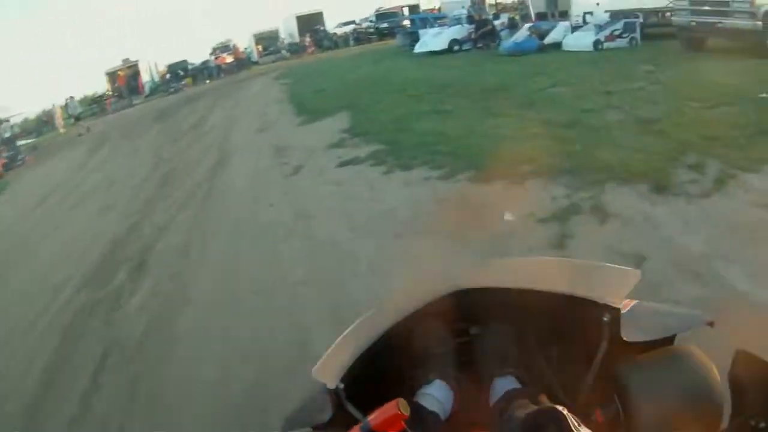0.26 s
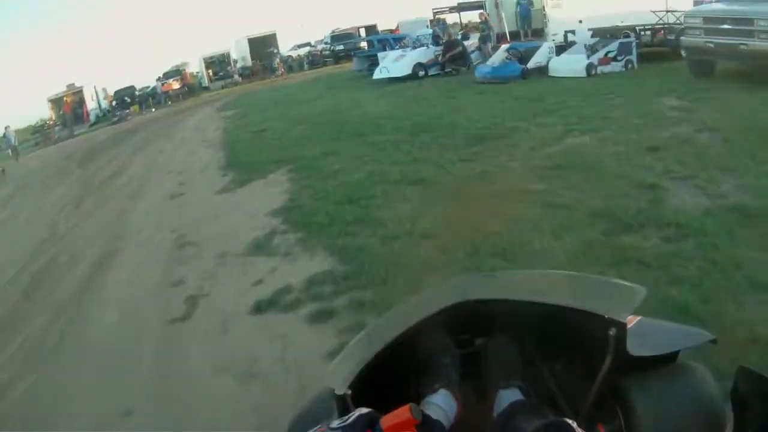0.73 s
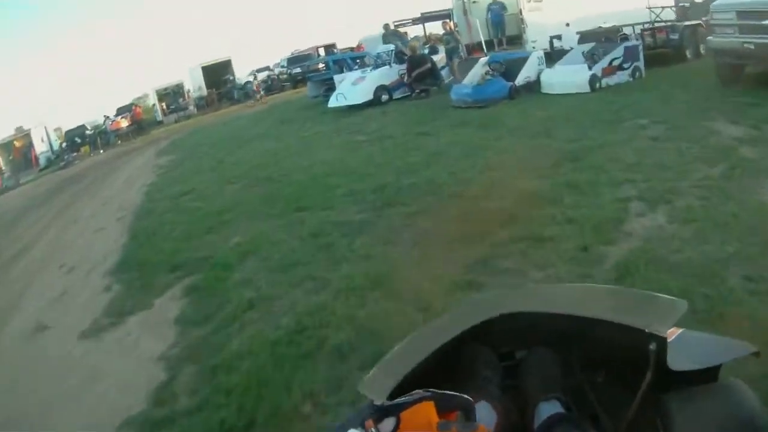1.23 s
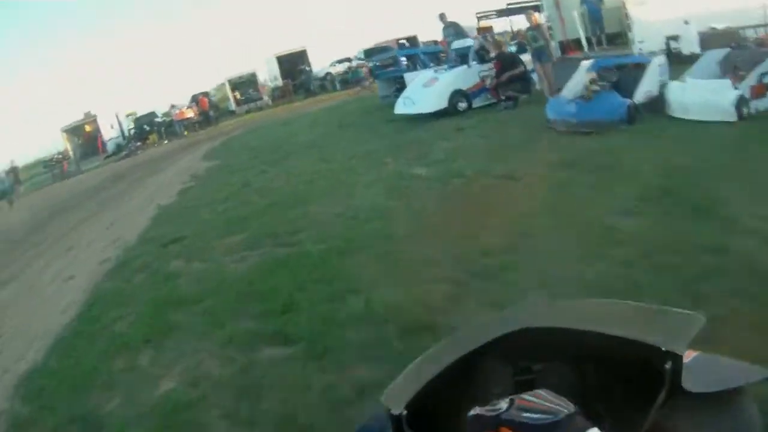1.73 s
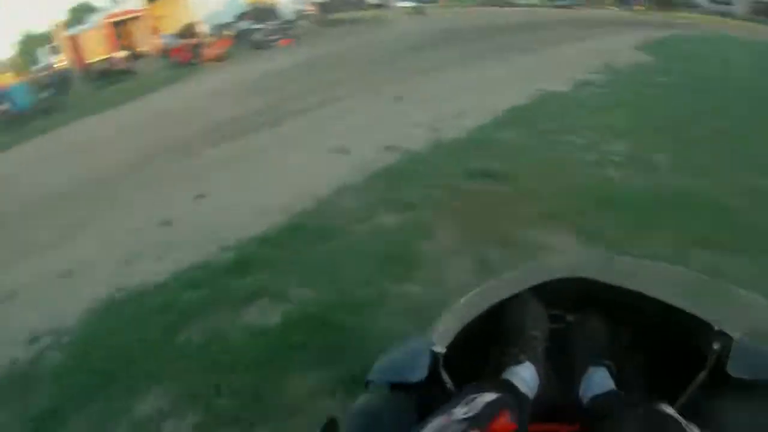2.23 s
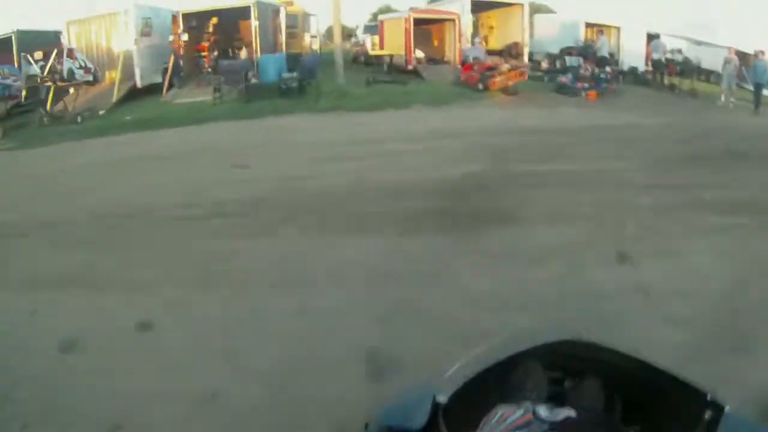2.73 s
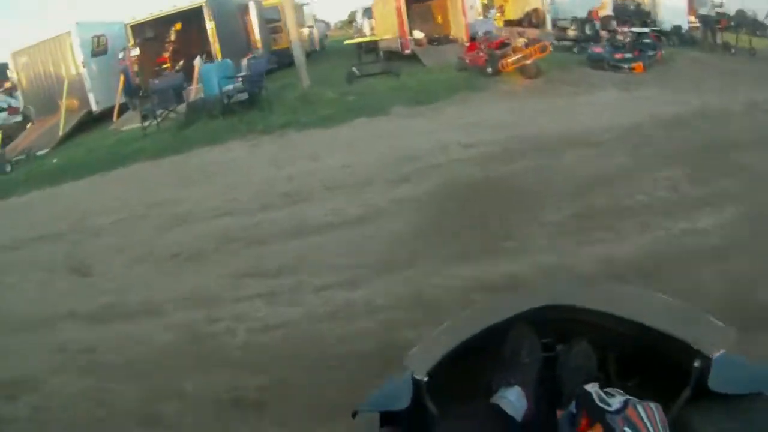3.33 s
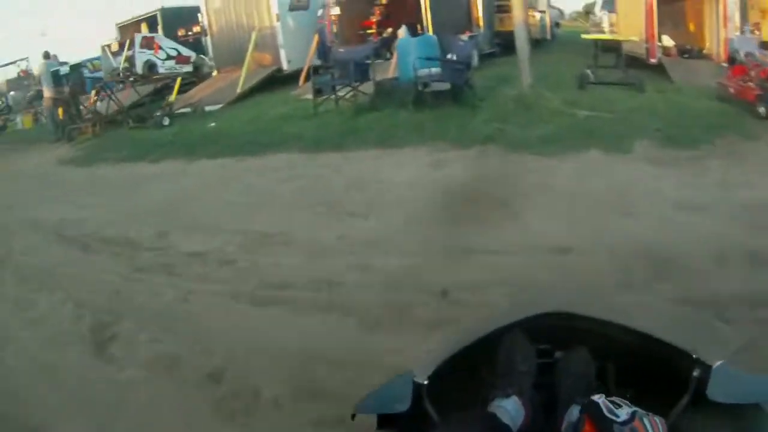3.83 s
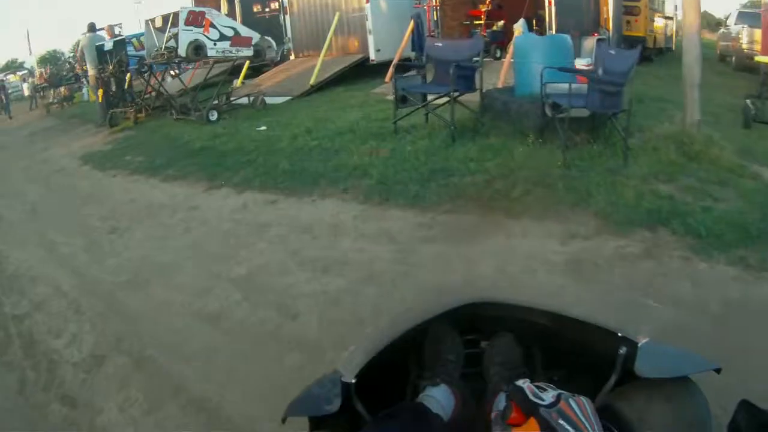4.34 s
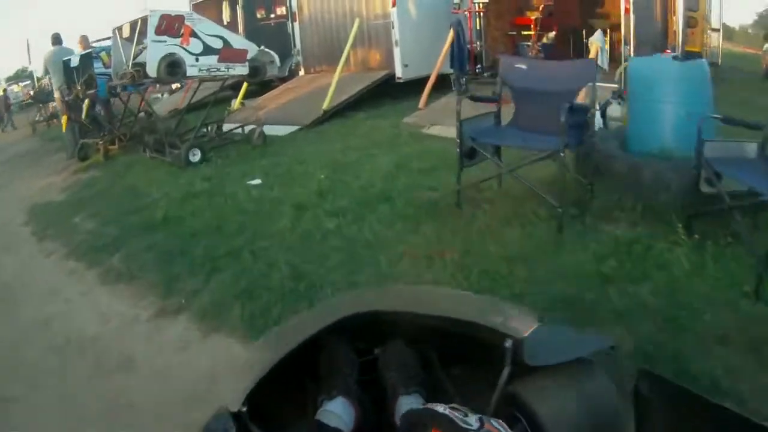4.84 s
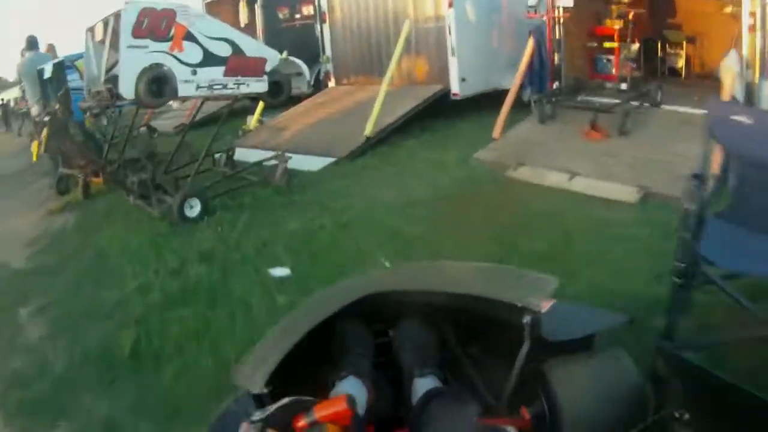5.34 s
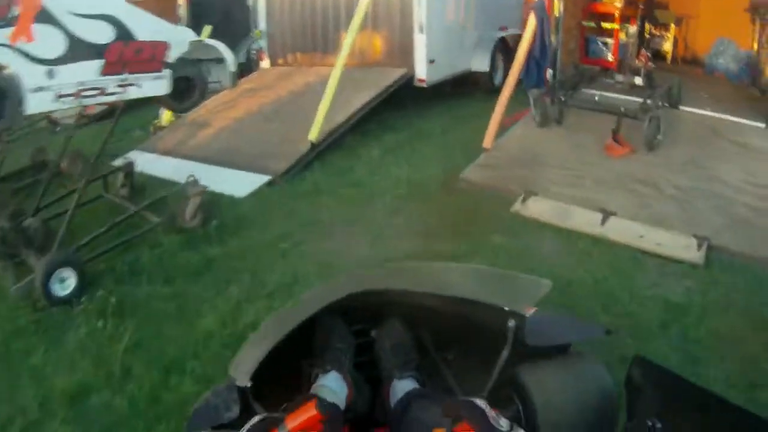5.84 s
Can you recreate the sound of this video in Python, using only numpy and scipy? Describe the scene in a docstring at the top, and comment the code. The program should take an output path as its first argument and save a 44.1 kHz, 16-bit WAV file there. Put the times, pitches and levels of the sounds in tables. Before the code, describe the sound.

Heard from on board, a single-cylinder kart engine sputters along, revs harder, then falls to an uneven, popping tick-over with two short blips.

```python
"""The lumpy, misfiring idle of a single-cylinder four-stroke racing kart, close on a microphone riding on it.
Rolling through the pits, it barks under throttle, is blipped twice and drops to a slow, coughing tick-over.
The pedal sets speed and charge. Each firing is a silencer boom, a bark and a gush of gas, with the intake
gulping between. Behind the exhaust the valve gear clatters, the chain rattles, the ride rumbles,
loose metal chinks, and the chassis knocks and squeaks once."""
import sys
import numpy as np
from scipy import signal
from scipy.fft import rfft, irfft, next_fast_len
from scipy.io import wavfile
from scipy.ndimage import map_coordinates

SR = 44100
rng = np.random.default_rng(int(sys.argv[2]) if len(sys.argv) > 2 else 0)


def waveform_to_disk(signal):
    """Save audio, clipped to [-1, 1], as 16-bit WAV at the path in sys.argv[1]."""
    frames = np.transpose(np.atleast_2d(signal))
    scaled = np.clip(frames, -1, 1) * 32767
    samples = np.round(scaled).astype(np.int16)
    wavfile.write(sys.argv[1], SR, samples)


N = 268128
TIME = np.arange(N) / SR
SIZE = 2 * next_fast_len(N // 2 + SR // 4)
HZ = np.fft.rfftfreq(SIZE, 1 / SR)

# pedal moves: start_s, opening (0-1), goal_firings_per_s, lag_s
PEDAL_MOVES = [(0, .38, 25.77, .2), (.588, .37, 23.65, .316), (1.134, .3, 27.55, .186),
               (1.433, 1, 32.86, .156), (2.815, 0, 17.94, .155), (3.643, .85, 33.2, .186),
               (3.923, 0, 14.8, .273), (4.96, .59, 30.62, .133), (5.114, 0, 12.9, .496)]
# top speed that the engine holds against the clutch: time_s, firings_per_s
SPEED_CEILING = [(1.58, 30.02), (1.72, 30.35), (1.8, 30.03), (2.12, 30.03), (2.2, 29.85), (2.48, 30.15),
                 (2.6, 29.88), (2.8, 29.85), (3.8, 30.02)]
# misfires (weaker) and coughs (stronger): time_s, change_db, snap (0-1)
ODD_FIRINGS = [(0.024, -8.5, 0), (.064, 1.5, 0), (0.105, 0.5, 0), (.181, -5, 0.1), (.22, 1.5, 0),
               (0.452, -12, 0), (0.49, 3, 0), (0.569, -8, 0), (0.608, 2, 0), (.687, 1.5, 0),
               (0.767, -10, 0), (.849, -6, 0), (.969, -18, 0), (1.009, 1, 0), (1.052, -12, 0),
               (1.097, -12, 0), (1.137, 0, 0), (1.334, -7, 0.1), (1.445, -2, 0), (1.481, -3, 0.4),
               (2.929, -2.5, 0), (3.062, 1.5, 0), (3.164, 6.5, 0), (3.445, -16, 0), (3.5, -12, 0),
               (3.545, 10.5, 0.9), (3.605, 12, 0.8), (3.658, 4, 0.53), (3.708, -12, 0), (3.75, -3, 0.5),
               (3.964, 1.5, 0), (3.999, 2, 0), (4.128, 2, 0.3), (4.173, 1.5, 0.1), (4.225, 3, 0.1),
               (4.386, 5.5, 0), (4.445, 4.5, 0), (4.499, 11.5, 0.6), (4.684, 8.5, 0.9), (4.819, 17, 0.83),
               (4.889, 10, 0.1), (4.98, -12, 0), (5.007, 4.5, .9), (5.054, 0.5, 1), (5.096, 1.5, 0.7),
               (5.138, 1, 0.7), (5.174, -0.5, 0.4), (5.22, -1.5, 0), (5.262, -1, 0), (5.356, 2.5, 0),
               (5.569, -1, 0), (5.611, 9.5, 0.65), (5.794, 11, 0.85), (5.92, -15, 0), (6.052, 14, 0.6)]
# loose metal on the shuddering frame: start_s, level_db, pitch_hz
LOOSE_METAL = [(3.02, -55, 14300), (3.112, -62, 9300), (3.275, -58, 7150), (3.337, -52, 8800),
               (3.395, -55.5, 6650), (3.465, -57, 6650), (3.55, -55, 6700), (3.818, -51, 13900),
               (3.845, -51, 13300), (4.5, -55, 6700), (4.579, -60, 8000), (4.69, -50, 6650),
               (4.825, -53, 6600), (5.172, -52, 10500), (5.925, -58, 6500), (5.983, -54, 6650),
               (6.058, -52, 6650)]
# rise and fall of the chain's rattle: time_s, relative_db
CHAIN_LEVELS = [(0.0, -49.5), (0.51, -48), (1.18, -50), (1.49, -45), (1.73, -43), (2.1, -42), (2.59, -43),
                (2.71, -42.5), (2.88, -48.5), (3.35, -55), (3.62, -54.5), (3.77, -46.5), (3.93, -44.5),
                (4.21, -53.5), (4.77, -54), (5.23, -48), (5.54, -53), (6.08, -54.5)]
# share of each colour through the turn: time_s, before (0-1), after (0-1)
TURN_BLEND = [(0, 0.44, 0.2), (1.2, .4, 0.5), (1.55, 1, 0), (1.85, 0.9, 0.3), (2.3, 0.25, 0.96),
              (2.55, 0.1, 1), (2.9, 0, 0.86), (3.3, 0, 0.4), (6.08, 0.47, 0)]

# broad spectrum of each source: frequency_hz, relative_db
RIDE_SPECTRUM = [(15, -28), (33, -5), (55, -24), (85, -22), (130, -18.5), (195, -16), (250, -27.5),
                 (600, -62)]
KNOCK_SPECTRUM = [(300, -18), (1500, -1), (3600, 4), (4800, 9), (6500, -31), (15000, -30)]
CHAIN_SPECTRUM = [(300, -51), (1500, -10), (3000, -7), (4900, 0.5), (6000, -6.5), (9000, -6),
                  (12000, -11.5), (15000, -11)]
VALVE_SPECTRUM = [(100, -46), (300, -16), (700, -8.5), (1050, -2), (1400, -1.5), (2000, -7), (3000, -8.5),
                  (4900, -11.5), (9000, -12), (15000, -31)]
SUCTION_SPECTRUM = [(30, -35), (120, -19), (190, -2.5), (260, -19), (400, -25), (550, -14), (800, -18),
                    (1500, -54)]
GULP_SPECTRUM = [(100, -53), (250, -0.5), (400, 3), (480, 7), (550, 6.5), (650, -1.5), (750, -25.5),
                 (900, 8.5), (1200, -26), (3000, -32)]
THUMP_SPECTRUM = [(30, -21), (60, -13), (85, -6), (125, 1.5), (170, 2), (230, -25), (400, -30), (1000, -68)]
RASP_SPECTRUM = [(1000, -21), (3000, 7), (6000, -13), (10000, -4.5), (15000, -2)]
CHUFF_SPECTRUM = [(400, -21.5), (800, -9.5), (1080, -1.5), (1400, -8), (1800, 3.5), (2200, -10),
                  (3000, -10), (6000, -21.5)]
SNAP_SPECTRUM = [(300, -33), (900, 8), (2000, -20.5), (4000, 6), (7000, 8.5), (10000, 0), (15000, 1)]
SPIT_SPECTRUM = [(200, -51), (700, -37.5), (1100, -9), (1400, -4), (2100, -3.5), (3000, -1), (4500, -1),
                 (6000, -7.5), (9000, -9.5), (12500, -11.5), (15000, -16)]
PUFF_SPECTRUM = [(200, -45), (700, -3.5), (1100, -4), (1400, -2.5), (2100, -0.5), (3000, -2.5),
                 (4500, -6.5), (6000, -10), (9000, -7.5), (12000, -16), (15000, -9)]
PUTT_SPECTRUM = [(100, -24), (290, -9), (450, -12), (680, -4), (800, -1), (980, -1.5), (1400, -3),
                 (1950, -3.5), (3000, -12.5), (4500, -12.5), (7000, -13.5), (15000, -47)]
BARK_SPECTRUM = [(100, -58.5), (280, -25.5), (400, -6), (700, -11), (900, 1), (1300, -12.5), (1850, 4.5),
                 (3000, -20), (4400, -5), (7000, -62), (15000, -74)]
BOOM_SPECTRUM = [(20, 6.5), (60, 1.5), (90, -30), (130, 3.5), (205, -7), (255, -12.5), (320, -6.5),
                 (400, -3), (600, -8.5), (900, -16), (1500, -56)]

# resonances and dips: centre_hz, width_hz, gain_db
BODY_MODES = [(511, 120, 7), (636, 112, 6.5), (821.4, 62, 8), (898.4, 66.5, 10), (958, 104, 8.5),
              (1047, 182, 11.5), (1192, 134, 10.5), (1529, 163, 14.5), (1741, 118, 9.5), (1832, 180, 9.5),
              (2008, 79, 8.5), (2196, 216, 11.5), (2558, 286, 14.5), (2927, 62, 10.5), (3340, 323, 14.5),
              (3826, 260, 11), (4367, 210, 8.5), (4790, 150, 9), (5092, 440, 9), (7055, 900, 10.5),
              (8660, 120, 7.5), (9810, 850, 5), (11420, 500, 6)]  # silencer and bodywork
BODY_DIPS = [(1270, 160, 1), (1690, 58, -9), (3020, 220, 0), (6200, 440, -1.5), (10360, 600, 0)]  # between those modes
CHAMBER_MODES = [(175.8, 38, 10), (193, 32.4, 19.5), (456, 290, -1.5)]  # air in the silencer
PIPE_MODES = [(824, 39, 2), (877.5, 22.5, -15), (902, 49, 8.5), (914, 23, -3), (995, 78, 3.5),
              (1800, 100, 3.5), (2814, 98, 6.5), (3120, 75, -12.5), (3850, 115, -8), (4330, 79, 0.5)]  # exhaust pipe under load
DRIVE_MODES = [(3630, 97, 2.5), (5050, 87, 3), (5740, 190, 9.5), (5930, 200, -9), (6990, 130, 2.5),
               (7930, 140, 4), (9960, 140, 7)]  # chain, sprocket and clutch drum
COLOUR_BEFORE = [(420, 430, 3.5), (662, 80, 3.5), (935, 114, -4), (1030, 70, 2), (1345, 68, 7),
                 (1705, 74, 2), (2870, 730, 4.5), (4410, 150, 8), (6280, 200, 7), (9000, 150, 10.5)]  # going into the turn
COLOUR_AFTER = [(740, 100, 2), (1620, 200, 3), (2140, 270, 4), (2470, 87, -2.5), (3330, 250, -4),
                (3880, 300, -3), (4180, 130, 8.5)]  # coming out of it


def amp(db):
    """Decibels to gain."""
    return 10 ** (np.asarray(db) / 20)


def wobble(rate, at=TIME):
    """A smooth random curve with rate knots per unit."""
    return map_coordinates(rng.standard_normal(int(at[-1] * rate) + 4), [at * rate], mode="nearest")


def lagged(x, lag_s):
    """x followed sluggishly."""
    step = 1 / (lag_s * SR)
    return signal.lfilter([step], [1, step - 1], x - x[0]) + x[0]


def colour(spectrum, resonances=()):
    """Causal response of unit power gain: a broad spectrum with ringing peaks."""
    points_hz, points_db = np.transpose(spectrum)
    db = np.interp(np.log(HZ + 1), np.log(points_hz), points_db)
    db += sum(gain / (1 + (2 * (HZ - hz) / width) ** 2) for hz, width, gain in resonances)
    cepstrum = irfft(np.log(amp(db)))
    cepstrum[1:SIZE // 2] *= 2  # fold to minimum phase
    cepstrum[SIZE // 2 + 1:] = 0
    return np.exp(rfft(cepstrum)) / np.sqrt(np.mean(amp(db) ** 2))


def filtered(x, response):
    """x through a frequency response."""
    return irfft(rfft(x, SIZE) * response, SIZE)[..., :N]


def noise(envelope, spectrum, resonances):
    """Noise shaped by an envelope, then coloured."""
    return filtered(envelope * rng.standard_normal(N), colour(spectrum, resonances))


def pulses(times, sizes):
    """One impulse at each time."""
    return np.bincount(np.clip(np.round(times * SR).astype(int), 0, N), sizes, N + 1)[:N]


def gush(rise_s, decay_s):
    """Envelope of peak 1 that swells and dies away."""
    t = TIME[:SR // 8]
    shape = (1 - np.exp(-(t / rise_s) ** 2)) * np.exp(-t / decay_s)
    return shape / shape.max()


def gushes(times, sizes, rise_s, decay_s):
    """One gush envelope at each time."""
    return signal.fftconvolve(pulses(times, sizes), gush(rise_s, decay_s))[:N]


def throttle(run_on_s=0.0776, run_on_share=0.78, fill_s=0.021):
    """Speed (firings per second) and charge (0-1): each pedal move starts a glide, up to a ceiling."""
    speed, opening = np.full(N, float(PEDAL_MOVES[0][2])), np.zeros(N)
    ceiling = np.interp(TIME, *np.transpose(SPEED_CEILING))
    for start_s, opened, goal, lag_s in PEDAL_MOVES:
        start = round(start_s * SR)
        glide = goal + (speed[start] - goal) * np.exp(-TIME[:N - start] / lag_s)
        speed[start:] = np.minimum(glide, ceiling[start:])
        opening[start:] = opened
    run_on = run_on_share * np.interp(TIME - run_on_s, TIME, opening)  # the intake feeds on after a lift
    return speed, lagged(np.maximum(opening, run_on), fill_s)


def firings(speed, charge, shut_db=-39, full_db=-26.5, starve_speed=21.65, jitter_s=0.00009):
    """Phase in cycles and each firing's time, strength and snap: more charge hits harder."""
    cycle = 1 / 3 + np.cumsum(speed) / SR
    times = np.interp(np.arange(1, int(cycle[-1]) + 1), cycle, TIME)
    starved_db = 1.83 * (1 - charge) * np.maximum(starve_speed - speed, 0)  # a slow, shut engine fades
    effort_db = shut_db + (full_db - shut_db) * charge - starved_db
    unsteady_db = 0.5 + 0.37 * (1 - charge)
    level_chance, time_chance = rng.standard_normal((len(times), 2)).T
    db = np.interp(times, TIME, effort_db) + np.interp(times, TIME, unsteady_db) * level_chance
    snaps = np.zeros(len(times))
    for time_s, change_db, snappy in ODD_FIRINGS:
        nearest = np.argmin(abs(times - time_s))
        times[nearest], snaps[nearest] = time_s, snappy
        db[nearest] += change_db
    return cycle, times + jitter_s * time_chance, db, snaps


def load(db):
    """How hard the engine pulls, 0-1, going by a firing's strength."""
    return np.clip((db + 35.0) / 10, 0, 1)


def coasting(db):
    """How far the engine coasts, 0-1, going by a firing's weakness."""
    return np.clip((-34.5 - db) / 5, 0, 1)


def clean_burn(times, db, from_speed=26, span_speed=2.2):
    """How cleanly each charge burns, 0-1: only under load and near top speed."""
    return load(db) * np.clip((1 / np.gradient(times) - from_speed) / span_speed, 0, 1)


def ride(charge, rumble_db=-68, shake_db=5):
    """Rough ground shakes the microphone, more so while the kart pulls."""
    level_db = rumble_db + shake_db * charge + 5.2 * wobble(4.3)
    return amp(level_db) * filtered(rng.standard_normal(N), colour(RIDE_SPECTRUM))


def chassis(knock_s=3.149, knock_db=-34, squeak_s=5.838, squeak_db=-48, squeak_hz=11100):
    """One dry knock from the frame and one tiny rising squeak."""
    blow = gushes(np.array([knock_s]), [amp(knock_db)], rise_s=0.0015, decay_s=0.0057)
    knock = noise(blow, KNOCK_SPECTRUM, BODY_MODES)
    pitch_hz = squeak_hz * (1 - 0.06 * np.clip((squeak_s - TIME) / 0.009, 0, 1) + 0.0051 * wobble(700))
    swell = amp(squeak_db) * np.exp(-((TIME - squeak_s) / 0.0093) ** 2)
    return knock + swell * np.sin(2 * np.pi * np.cumsum(pitch_hz) / SR)


def chinks(flutter_rate=500, scrape=0.3):
    """Each loose piece buzzes briefly at its own pitch, with a little scrape."""
    shape = gush(rise_s=0.0044, decay_s=0.0058)
    t, out = TIME[:len(shape)], np.zeros(N + SR)
    for start_s, level_db, pitch_hz in LOOSE_METAL:
        phase = 2 * np.pi * pitch_hz * t
        ring = wobble(flutter_rate, t) * np.sin(phase) + wobble(flutter_rate, t) * np.cos(phase)
        buzz = ring + scrape * rng.standard_normal(len(t))
        out[round(start_s * SR):][:len(t)] += amp(level_db) * shape * buzz
    return out[:N]


def chain(cycle, charge, gain_db=0.85, taut_db=-3.5, tug_db=2.0, tug_cycles=0.64):
    """The drive chain rattles brightly; under load it is pulled taut and tugged once a cycle."""
    level_db = np.interp(TIME, *np.transpose(CHAIN_LEVELS)) + gain_db + taut_db * charge ** 2
    swell_db = tug_db * charge * np.cos(2 * np.pi * (cycle - tug_cycles))
    grain_db = 2.18 * wobble(400) + 0.61 * wobble(18)
    envelope = amp(level_db + swell_db + grain_db)
    return noise(envelope, CHAIN_SPECTRUM, BODY_MODES + BODY_DIPS + DRIVE_MODES)


def valve_gear(cycle, speed, charge, base_db=-48, top_speed=30.022, db_per_octave=4.5, load_db=6):
    """A grainy clatter that builds with speed and load and swells with each turn of the crank."""
    level_db = lagged(base_db + db_per_octave * np.log2(speed / top_speed) + load_db * charge, 0.011)
    swell_db = 0.25 * np.cos(4 * np.pi * cycle - 1.5) + 2.56 * wobble(350) + 0.63 * wobble(15)
    return noise(amp(level_db + swell_db), VALVE_SPECTRUM, BODY_MODES + BODY_DIPS)


def suction(cycle, charge, pull_db=-37, delay_cycles=0.4435, ring_hz=197, width_hz=34):
    """Against a shut throttle the intake stroke tugs at the air between firings, keeping up a hum."""
    times = np.interp(np.arange(1, int(cycle[-1])) + delay_cycles, cycle, TIME)
    shut = 1 - np.interp(times, TIME, charge)
    hum = colour(SUCTION_SPECTRUM, [(ring_hz, width_hz, 24)] + BODY_MODES)
    return filtered(pulses(times, shut * amp(pull_db)), hum)


def intake(cycle, db, uneven_db=1.3, jitter_s=0.00004):
    """The intake gulps a third of a cycle after each firing; a third later its valve thuds shut."""
    fired = np.arange(1, len(db) + 1)
    chance = rng.standard_normal((len(db), 4)).T
    opens, shuts = np.interp([fired + 1 / 3, fired + 2 / 3], cycle, TIME) + jitter_s * chance[:2]
    gulp, thud = load(db) * amp(db + uneven_db * chance[2:])
    strokes = pulses(opens, gulp * amp(8.0)) + pulses(shuts, thud * amp(6.0))
    return filtered(strokes, colour(GULP_SPECTRUM, BODY_MODES))


def thump(times, charge, push_db=-36, uneven_db=3.0):
    """Off the throttle, each opening of the exhaust valve still shoves out a short, low puff."""
    shut = 1 - np.interp(times, TIME, charge)
    shoves = shut * amp(push_db + uneven_db * rng.standard_normal(len(times)))
    return filtered(pulses(times, shoves), colour(THUMP_SPECTRUM))


def rasp(times, db, gain_db=-22, grain_db=4):
    """Under load, gas keeps tearing out of the pipe between the firings."""
    flow = gushes(times, load(db) * amp(db + gain_db), rise_s=0.02, decay_s=0.01)
    return noise(flow * amp(grain_db * wobble(900)), RASP_SPECTRUM, BODY_DIPS)


def chuff(times, db):
    """At low speed or with the throttle shut the charge burns slowly: a soft, hollow chuff."""
    slow = (1 - clean_burn(times, db)) * (0.49 + 0.5 * coasting(db))
    burn = gushes(times + 0.0016, slow * amp(db - 2.86), rise_s=0.0088, decay_s=0.005)
    return noise(burn, CHUFF_SPECTRUM, BODY_MODES + BODY_DIPS)


def cough(times, db, snaps, lead_s=0.0058, gain_db=-8.0):
    """A charge lights early and sputters out brightly."""
    burst = gushes(times - lead_s, snaps * amp(db + gain_db), rise_s=0.012, decay_s=0.0065)
    return noise(burst, SNAP_SPECTRUM, BODY_MODES + BODY_DIPS)


def gas(times, db):
    """Turbulent gas follows each firing: a short thin spit under load, a longer puff at idle."""
    spit = gushes(times, load(db) * amp(db - 0.5), rise_s=0.0052, decay_s=0.0036)
    idle = (1 - clean_burn(times, db)) * (1 - 0.5 * load(db)) * (1.5 - 0.55 * coasting(db))
    puff = gushes(times, idle * amp(db - 8.5), rise_s=0.0048, decay_s=0.0099)
    return (noise(spit, SPIT_SPECTRUM, BODY_MODES + BODY_DIPS + PIPE_MODES)
            + noise(puff, PUFF_SPECTRUM, BODY_MODES + BODY_DIPS))


def pipe_echoes(spread_s):
    """Echoes in the pipe: each frequency above the bass leaves at its own delay."""
    delay_s = spread_s * abs(wobble(1 / 170, HZ)) * np.clip(HZ / 600 - 0.3, 0, 1)
    return np.exp(-2j * np.pi * np.cumsum(delay_s) * HZ[1])


def bark(times, db):
    """The front of each firing: a round putt at idle, a hard bright bark under load."""
    idle = (1 - load(db)) * (1 - 0.39 * coasting(db))
    soft = pipe_echoes(spread_s=0.004) * colour(PUTT_SPECTRUM, BODY_MODES + BODY_DIPS)
    hard = pipe_echoes(spread_s=0.00281) * colour(BARK_SPECTRUM, BODY_MODES + BODY_DIPS + PIPE_MODES)
    return (filtered(pulses(times, idle * amp(db + 20.0)), soft)
            + filtered(pulses(times, load(db) * amp(db + 24.0)), hard))


def boom(times, db, charge, full_db=-34, growth=1.35, thin_db=-44.0, pumped_db=-39):
    """The pressure step of each firing rings the silencer chamber, even on a misfire."""
    filled = np.interp(times, TIME, np.clip(charge / 0.2, 0, 1))
    thin_push_db = thin_db + 0.7 * (db - thin_db)  # a thin charge pushes little gas
    push_db = filled * np.maximum(db, pumped_db) + (1 - filled) * thin_push_db
    push = amp(growth * (push_db - full_db))
    steps = amp(-18.0) * push / np.hypot(1, push)  # levels off above full_db
    return filtered(pulses(times, steps), colour(BOOM_SPECTRUM, CHAMBER_MODES + BODY_MODES))


def turning(x):
    """Peaks and dips swell and fade while the kart turns."""
    time_s, before, after = np.transpose(TURN_BLEND)
    flat = [(20, 0), (20000, 0)]
    return x + sum(np.interp(TIME, time_s, share) * (filtered(x, colour(flat, peaks)) - x)
                   for share, peaks in ((before, COLOUR_BEFORE), (after, COLOUR_AFTER)))


def scene():
    """On board: engine, frame and ground reach both microphone ports alike."""
    speed, charge = throttle()
    cycle, times, db, snaps = firings(speed, charge)
    exhaust = boom(times, db, charge) + thump(times, charge) + bark(times, db)
    exhaust += chuff(times, db) + gas(times, db) + cough(times, db, snaps) + rasp(times, db)
    metal = valve_gear(cycle, speed, charge) + chain(cycle, charge) + chinks()
    breathing = intake(cycle, db) + suction(cycle, charge)
    kart = turning(exhaust + breathing + metal) + chassis() + ride(charge)
    return np.array([kart, kart])


def record(dry, leak_hz=105, alike_hz=800, top_hz=15650):
    """The microphone's right port loses deep bass; above about alike_hz the two channels are simply the same,
    and both stop at top_hz."""
    leak = leak_hz / (1j * HZ + leak_hz) * np.exp(-(HZ / alike_hz) ** 2)
    ports = np.array([np.ones_like(HZ), 1 - leak])
    return filtered(dry, ports * (HZ < top_hz))


dry = scene()
out = record(dry)
waveform_to_disk(out)
```